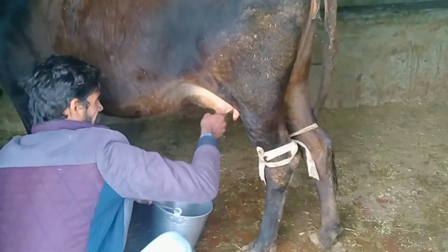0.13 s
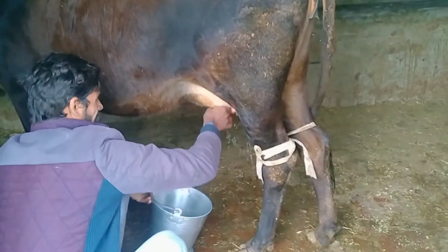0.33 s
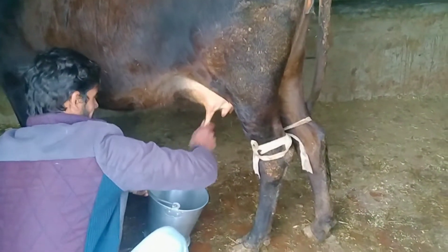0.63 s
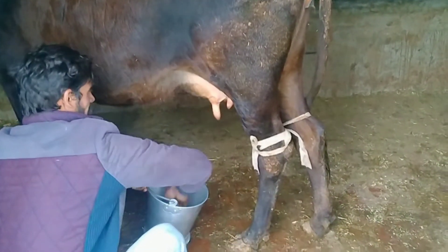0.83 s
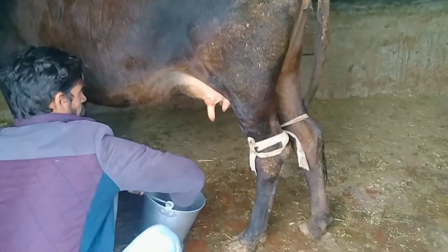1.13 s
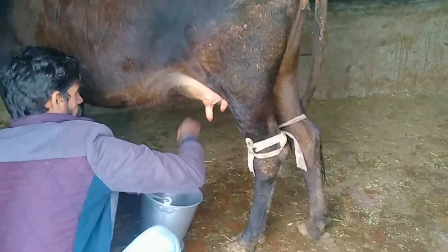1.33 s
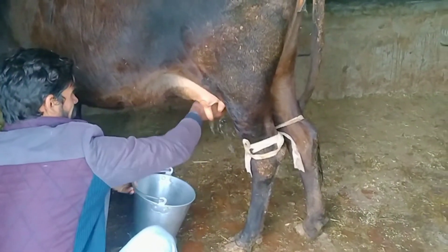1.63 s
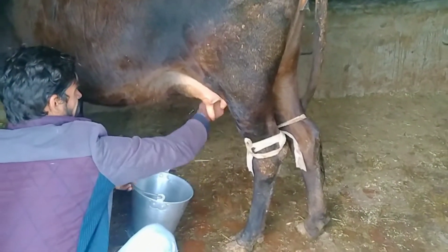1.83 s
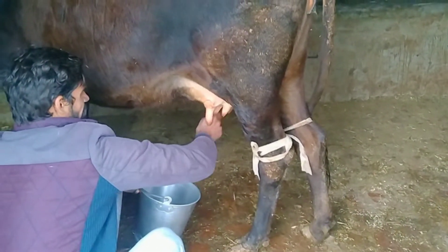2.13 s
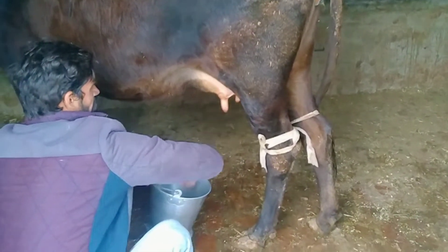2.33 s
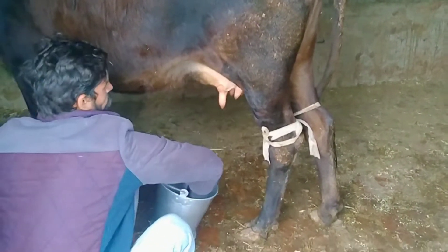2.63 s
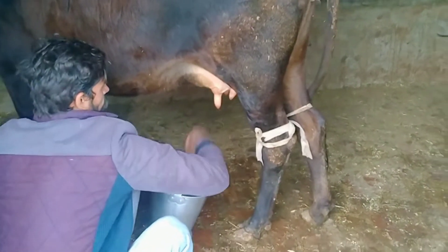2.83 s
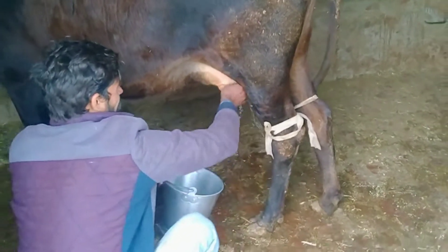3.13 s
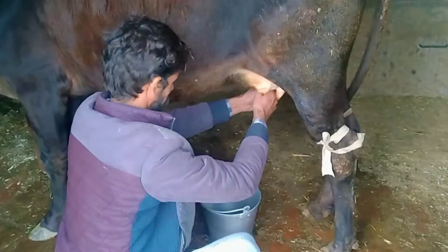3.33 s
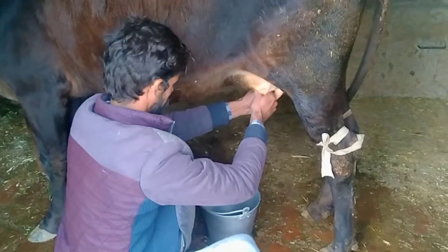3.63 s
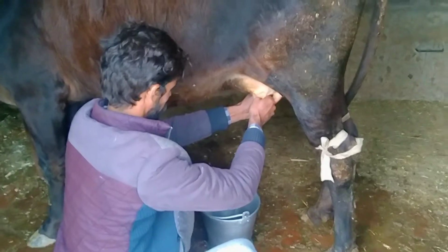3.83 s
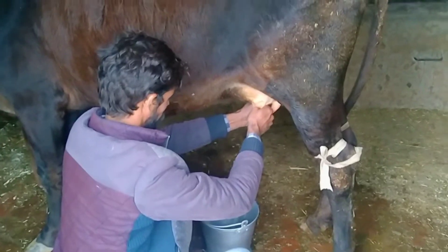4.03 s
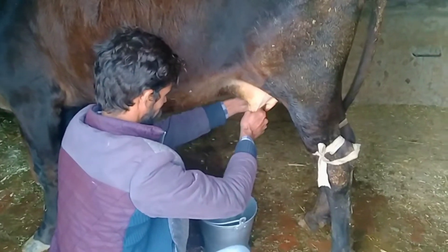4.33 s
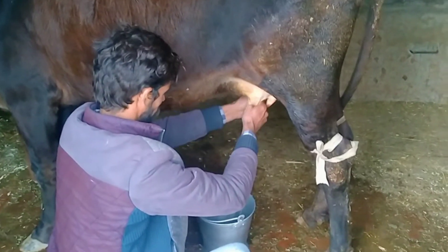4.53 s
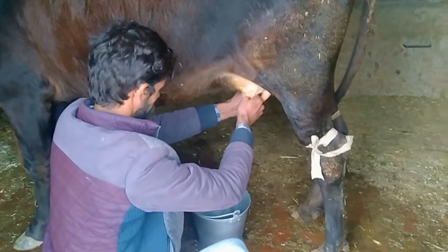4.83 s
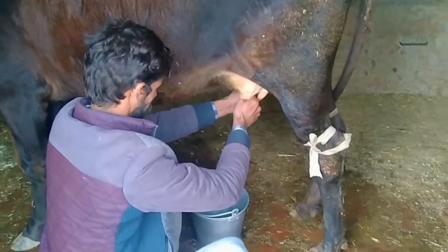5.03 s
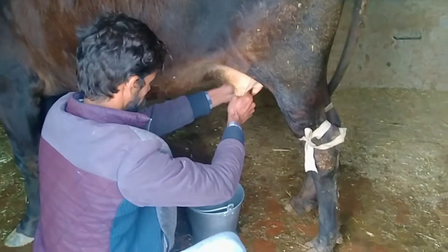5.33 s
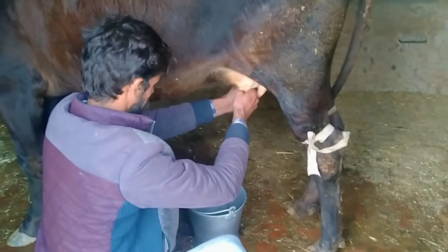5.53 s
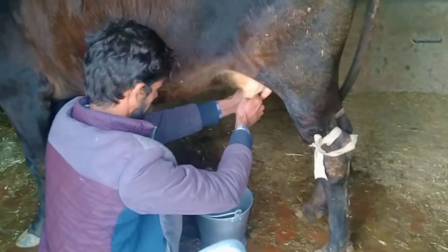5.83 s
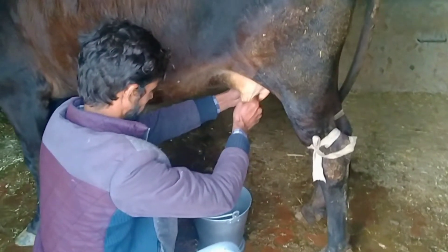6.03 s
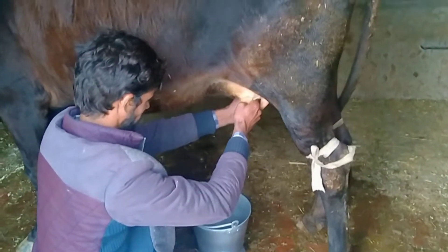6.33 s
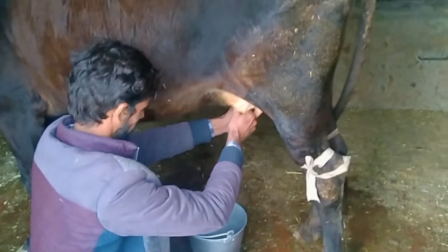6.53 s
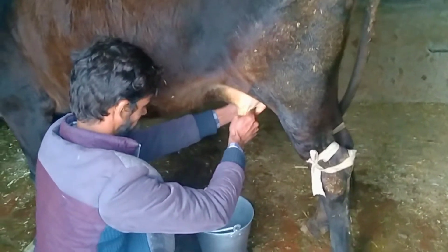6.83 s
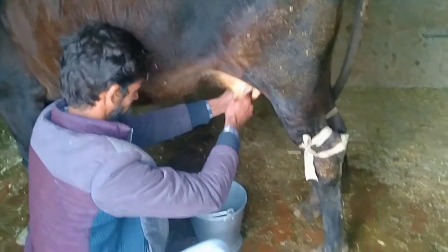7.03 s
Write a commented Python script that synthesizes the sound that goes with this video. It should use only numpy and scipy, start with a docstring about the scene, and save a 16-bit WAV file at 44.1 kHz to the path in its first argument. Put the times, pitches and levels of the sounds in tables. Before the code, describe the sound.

Wet plops, drips and slippery finger snaps over a bucket in a shed, then rhythmic jets of milk ring and hiss against bare steel.

```python
"""Plops, drips and wet snaps come first: a hand wets the teats with water from a steel bucket, a far machine
whining. Then jets of milk hit the bare steel, which sings and hisses, with one deep thump; faint rumble and hush.
Droplet impulses drive the steel's resonances, the spatter and the mist; drips and plops are climbing sines;
snaps are short clicks with a hissing tail; skin and slosh are coloured grains, the machine narrow filtered noise."""
import sys
import numpy as np
from scipy import signal
from scipy.fft import rfft, irfft, next_fast_len
from scipy.io import wavfile
from scipy.ndimage import uniform_filter1d

SR = 44100
rng = np.random.default_rng(int(sys.argv[2]) if len(sys.argv) > 2 else 0)


def output_pcm(signal):
    """Save a mono or channel-first signal as 16-bit PCM at the path in sys.argv[1].

    Samples are clipped to [-1, 1] before scaling.
    """
    pcm = np.clip(np.atleast_2d(signal).T, -1, 1) * 32767
    wavfile.write(sys.argv[1], SR, np.round(pcm).astype(np.int16))


N = 316197   # length in samples

# Spectra give relative colour only; each coloured layer is brought to rms 1 before its level.
# low rumble of the shed air: pitch_hz, density_db (per Hz)
RUMBLE_SPECTRUM = [(8.8, -14), (15, 8), (32, -4), (65, 1), (90, -9), (130, -9.5), (210, -17), (329, -16),
                   (380, -12.5), (418, -14.5), (499, -20), (656, -21), (700, -19.5), (910, -66),
                   (1540, -120)]
# rumble level through time, before a 1 dB lift: time_s, level_db
RUMBLE_LEVEL = [(0, -63), (1.0, -59.5), (1.4, -62), (2.9, -63.5), (3.45, -64), (3.73, -70.5), (3.93, -65.5),
                (4.7, -62), (6.0, -59.5), (7.17, -60.5)]
# faint steady hush: pitch_hz, density_db (per Hz)
HUSH_SPECTRUM = [(240, -49), (400, -26.5), (942, -24.5), (1320, -25), (1540, -22), (1740, -16), (2090, -27),
                 (10100, -37.5), (13100, -35.5), (15500, -32)]
# tones of the far machine: pitch_hz, width_hz, level_db (relative)
WHINE_TONES = [(1159, 19, -13), (1336, 19, -16), (1913, 16, -7.5), (2764, 5.2, -4.5), (2790, 7.5, -14),
               (3910, 13, -17.5)]
# gain of the whole whine: time_s, gain_db
WHINE_GAIN = [(0, -61), (1.2, -60), (2.25, -63.5), (2.45, -74), (2.6, -100), (7.17, -100)]

# drips ringing on the water; the last is a low thud as the second squirt lands:
# start_s, level_db (before trim), pitch_hz (at the start)
DRIPS = [(.185, -63.5, 686), (.861, -46.5, 3440), (.883, -47, 2390), (0.906, -50, 4800), (0.907, -46, 7200),
         (.95, -46, 7160), (1.012, -52, 1600), (1.031, -48, 1373), (1.058, -49.5, 3850), (1.084, -43, 5300),
         (1.143, -47.5, 4770), (1.151, -46.5, 2070), (1.187, -44, 7880), (1.2, -47, 1100),
         (1.228, -45, 2680), (1.245, -50, 5300), (1.297, -45.5, 3600), (1.313, -40.5, 2360),
         (1.313, -45.5, 1282), (1.322, -44, 3340), (1.342, -40.5, 2090), (1.436, -44, 2150),
         (2.454, -51.5, 1234), (2.588, -46, 2380), (2.625, -55, 3200), (2.82, -58, 2720),
         (2.847, -52, 4670), (2.911, -54, 1630), (2.926, -52, 6100), (3.047, -49.5, 1324),
         (3.215, -61.5, 1055), (4.19, -55, 777)]
# low plops, four while the hand is wetting and a deep thump during the jets:
# start_s, level_db (before trim), pitch_hz (at the start), t60_s (before the note is closed off), rise_s
PLOPS = [(0.176, -45, 320, 0.051, .01), (.884, -37, 379.3, 0.52, 0.023), (1.881, -52, 380, 0.051, .008),
         (2.453, -38.5, 373.3, 0.38, 0.004), (5.77, -46.5, 129, 0.17, 0.011)]
# thin squeaks of wet fingers sliding: start_s, end_s, from_hz, to_hz, level_db (before the uneven slip)
SQUEAKS = [(2.58, 2.648, 4280, 4600, -65), (3.27, 3.378, 3110, 3290, -65), (3.324, 3.426, 2100, 1950, -69),
           (3.734, 3.79, 3650, 5130, -74)]
# loud wet snaps of skin and water film: start_s, level_db, pitch_hz, air_db (relative, before trim)
LOUD_SNAPS = [(0.0315, -42, 7500, -23), (0.0988, -38, 5600, -18), (0.2737, -27, 5230, -47),
              (0.4284, -43.5, 4770, -28), (0.5786, -53, 8360, -4), (0.7566, -54, 6700, -14),
              (0.8216, -41.5, 6300, -12), (0.84, -43, 6400, -20), (0.861, -40, 7260, -12),
              (0.8824, -42, 7210, -23), (0.9233, -47, 6470, -3), (1.1034, -50, 6720, -11),
              (1.2271, -44, 7330, -25), (1.3116, -42, 6800, -8), (1.5968, -51, 7360, -6),
              (1.7865, -38, 5400, -15), (1.803, -31.5, 6250, -25), (1.8437, -32.5, 6660, -12.5),
              (2.2447, -41, 6140, -12), (2.4204, -44, 4870, -23), (2.4337, -27, 6540, -29),
              (2.825, -57, 7080, -1), (3.096, -49, 5130, -13), (3.276, -51, 4550, 2),
              (3.4685, -35.5, 6200, -31), (3.5042, -33, 5580, -15), (3.8287, -45, 6820, 1)]
# water round the hand: time_s, gain_db, colour_hz
SLOSH_MOVES = [(0, -63, 2600), (.2, -60, 2460), (.27, -65, 2900), (.5, -63, 2550), (.7, -60.5, 2560),
               (.97, -59.5, 2750), (1.04, -50.5, 1680), (1.09, -57.5, 2500), (1.14, -52.5, 2200),
               (1.3, -57, 2570), (1.44, -60.5, 2260), (1.5, -64.5, 2650), (1.8, -61, 2650),
               (2.2, -64, 2340), (2.38, -65, 2650), (2.47, -63, 1500), (2.52, -63.5, 3060),
               (2.71, -59.5, 2200), (2.78, -64.5, 2200), (2.9, -56.5, 1740), (3.05, -64, 1560),
               (3.2, -71, 1860), (3.29, -63.5, 3070), (3.54, -61, 2700), (3.565, -73, 2700)]
# colour of the water grains: pitch_hz, density_db (per Hz)
SLOSH_SPECTRUM = [(290, -29), (500, -9.5), (841, 2), (1560, 0), (1680, 0), (2060, -0.5), (3270, 1),
                  (5000, -11), (6500, -25), (11000, -120)]
# rustling swells, mostly rubbing fingers; the one at 0.278 s is the tail of a loud snap:
# end_s, build_s, rustle_db, air_db (relative to the rustle)
RUSTLE_SWELLS = [(.03, 0.079, -66, -9), (.21, 0.85, -62, -5.5), (0.278, 0.013, -53.5, -34),
                 (.48, 0.089, -63.5, 4), (.75, 1, -68.5, -5), (.96, 0.4, -60.5, -5),
                 (1.06, 0.044, -65, -22), (1.14, 0.28, -56.5, -7), (1.35, 0.08, -47, -8.5),
                 (1.6, 0.042, -67, -5), (1.86, 0.44, -61, 2.5), (2.04, 0.19, -66, -9),
                 (2.25, 0.067, -64, -6), (2.432, 0.044, -51, -9), (2.71, 0.5, -63.5, -11),
                 (2.87, 0.097, -58, 1), (2.93, 0.11, -62.5, -4), (3.16, .3, -68, -3),
                 (3.28, 0.043, -66.5, 5.5), (3.51, 0.33, -61.5, -2)]
# body of the rustle: pitch_hz, density_db (per Hz)
RUSTLE_SPECTRUM = [(2060, -6), (3500, -5), (4280, -9.5), (5290, -8.5), (5830, -5), (7640, -3.5),
                   (9500, -34), (12400, -44), (20900, -120)]
# airy top of the rustle: pitch_hz, density_db (per Hz)
RUSTLE_AIR_SPECTRUM = [(5000, -37), (8500, -8.5), (9640, -5.5), (11100, -8), (14900, 4), (15500, 5)]

# jets of milk: start_s, swell_s, hold_s, bottom_db, wall_db, spray_db, aim (0 = on the wall, 1 = on the bottom),
# then favour_db for each of the four mode families, set by the spot that is hit
SQUIRTS = [(3.781, 0.099, 0.088, -49.5, -51, -52.5, 0.41, 1.5, -5.5, 4.5, -0.5),
           (4.187, 0.045, 0.11, -54.5, -49, -52.5, 0.34, 0, 0, 6, 0.5),
           (4.585, 0.057, 0.047, -47, -45.5, -50, 0.23, 2, 0.5, -4, -9),
           (4.748, 0.076, 0.11, -49.5, -47, -48, 0.052, -10, 1, 6, -8.5),
           (4.997, .1, .24, -39.5, -43.5, -45.5, 0.79, .1, -6, 4, -1.5),
           (5.465, 0.086, .18, -42.5, -41, -44, 0.091, -1, 4, -1, -3.5),
           (5.852, 0.19, 0.063, -37, -39, -40, 0.92, 4.5, 2.5, 5, 1),
           (6.302, 0.077, .19, -36, -40.5, -47, 0.17, 7.5, -4.5, -2.5, 4.5),
           (6.677, .14, .1, -38, -38.5, -40, 0.92, 3.5, 1, 2.1, 3),
           (7.073, 0.14, .1, -39.5, -39, -43, 0.89, -2, -5, 3, 4)]
# bucket modes: pitch_hz (before the pitch factor), width_hz, on_wall_db, on_bottom_db (relative)
BUCKET_MODES = [(729.4, 23, -5, -2), (735.9, 23, -8.5, 9), (820, 84, -28.5, -18.5), (1172, 31, -4, -3.5),
                (1247, 57, 6, -3), (1278, 52.6, 2.5, 1.5), (1373.4, 28.6, -2.5, -0.5), (1493, 26, -45, -3),
                (1958, 23, 6.5, -6), (2040, 92.4, 4.5, 5), (2056, 48, 0, 1.5), (2085, 18.3, 7, -8.5),
                (2150, 16, -32, -7), (2540, 32, -16, 1), (2807, 43, -8.5, -8.5), (2995, 49, -1.5, -12),
                (3516, 32, -21.5, -6), (4060, 36, -1.5, -11), (4200, 31, -23, -23), (4434, 56, -16.5, -3.5),
                (5060, 24, -18, -10), (5335, 48, -4.5, -0.5), (5774, 230, -13.5, -4.5), (6370, 73, -32, -5),
                (6705, 46, -4.5, -15.5), (6830, 29, -4, -0.5), (6900, 76, -14, -30), (7140, 54, -11, 0),
                (7280, 130, -3.5, -9.5), (8450, 200, -9.5, -53)]
# neighbouring modes favoured together: centre_hz, reach (in natural-log pitch)
MODE_FAMILIES = [(740, .05), (2050, .06), (4150, .06), (7280, .06)]
# wash of dense unresolved wall modes: pitch_hz, density_db (per Hz)
WALL_WASH_SPECTRUM = [(1350, -54), (2300, -18), (3010, -5.5), (3780, 1.5), (4070, 0), (4720, -4), (7350, 0),
                      (10000, -14), (13000, -49), (22000, -120)]
# milk film spattering on the bottom: pitch_hz, density_db (per Hz)
FILM_SPECTRUM = [(300, -25), (500, -5.5), (900, 5), (1600, 1.5), (2300, -11), (3200, -3)]
# hissing mist: pitch_hz, density_db (per Hz)
SPRAY_SPECTRUM = [(4710, -40), (8000, -9), (9340, -8.5), (10600, -2), (11300, -1.5), (12600, 2),
                  (14900, 2.5), (15500, 1)]
# last drops of a squirt pattering on the milk film: time_s, level_db
DRIBBLE_LEVEL = [(4.4, -89), (4.45, -84), (4.58, -64.5), (4.62, -78)]

HUSH_DB = -73.5
SHED_T60_S, SHED_DB = 0.14, -15
CUTOFF_HZ = 15550
DRIP_T60_S, DRIP_SHORTENS = 0.1, 0.91   # ring time at 1 kHz; power of pitch by which it shrinks
SMALL_SNAPS, WET_UNTIL_S = 26, 3.5   # how many small snaps, and the latest they can start
SMALL_SNAP_DB, SMALL_SNAP_HZ, SMALL_AIR_DB = (-60, -54), (4570, 7600), (-20, -11)   # ranges of chance
RUSTLE_BUILD_DB, RUSTLE_FADE_DB_PER_S = 18.5, 265
AIR_SHARE = 1.77   # the air swings wider than the rustle
# pressure of a squirt: lands, swells, holds, dies
ATTACK_S, FIRST_TOUCH_DB, RELEASE_DB_PER_S = 0.019, -6.5, 129.5
# how far bottom, wall and spray follow the pressure
SWELL_SHARES, RELEASE_SHARES = (0.7, 1.23, 1.07), (0.56, 0.85, 1.01)
# spatter and wash against the ringing: on the wall, then the gain as the aim moves to the bottom
FILM_DB, FILM_AIM_DB, WASH_DB, WASH_AIM_DB = -19, 8.5, -4.5, 4.5
BOTTOM_TOP_HZ = 2300   # modes below feed the bottom ring, the others the wall ring
# milk loads the modes below the top as it collects: pitch factor at the first squirt and its fall
EMPTY_PITCH, PITCH_SAG_PER_S, LOADED_TOP_HZ = 1.021, 0.011, 4350
# the jet shifts, so each mode above the steady ones swells and sinks on its own
MODE_WANDER_DB, STEADY_TOP_HZ = 2, 800
# the broad hollow mode in this range is loud in the empty bucket and drowns in milk
BODY_HZ, BODY_EMPTY_DB, BODY_DAMP_DB_PER_S = (800, 900), 10.5, 4.0


def from_db(db):
    """Decibels to amplitude."""
    return 10 ** (np.asarray(db) / 20)


def rms_one(x):
    """Bring a sound to rms 1."""
    return x / np.sqrt(np.mean(x ** 2) + 1e-20)


def in_time(rows):
    """Columns of a table joined by straight lines; -120 outside its span."""
    s, *columns = np.transpose(rows)
    return [np.interp(np.arange(N) / SR, s, c, left=-120, right=-120) for c in columns]


def drift(rate_hz):
    """Slow chance of rms 1: low-passed noise, made at every 40th sample and joined by lines."""
    r = np.exp(-80 * np.pi * rate_hz / SR)
    noise = rng.standard_normal(N // 40 + 2002)
    slow = signal.lfilter([1], [1, -2 * r, r * r], noise)[2000:]   # drop the filter's start-up
    return np.interp(np.arange(N) / 40, np.arange(len(slow)), rms_one(slow))


def coloured(x, spectrum):
    """Give a signal a spectrum in dB per Hz, drawn over log pitch; rms 1."""
    size = next_fast_len(N)
    hz = np.maximum(np.fft.rfftfreq(size, 1 / SR), 1)
    points = np.array(spectrum)
    gain_db = np.interp(np.log(hz), np.log(points[:, 0]), points[:, 1], left=-90, right=-90)
    return rms_one(irfft(rfft(x, size) * from_db(gain_db), size)[:N])


def resonance(x, hz, width_hz):
    """Two-pole resonance with gain close to 1 on top."""
    r = np.exp(-np.pi * width_hz / SR)
    feed = np.array([1, 0, -1]) * (1 - r * r) / 2
    return signal.lfilter(feed, [1, -2 * r * np.cos(2 * np.pi * hz / SR), r * r], x)


def droplets(per_s, spread_db):
    """Random impacts of uneven size and either sign; rms 1."""
    sizes = from_db(spread_db * np.minimum(rng.exponential(1, N), 5)) * rng.choice([-1, 1], N)
    return rms_one(sizes * (rng.random(N) < per_s / SR))


def add(out, s, sound):
    """Mix a short sound in at time s."""
    at = round(s * SR)
    out[at:at + len(sound)] += sound[:N - at]


def even(x):
    """Take out slow level changes."""
    return x / np.sqrt(uniform_filter1d(x ** 2, size=13000) + 1e-9)


def blend(ring, noise, noise_db):
    """Ringing and noise in a set ratio, at the power of one."""
    return (ring + from_db(noise_db) * noise) / np.sqrt(1 + from_db(noise_db) ** 2)


def rumble():
    """Low shed air: coloured noise whose level moves slowly."""
    level_db = in_time(RUMBLE_LEVEL)[0] + 1.0
    return from_db(level_db) * coloured(rng.standard_normal(N), RUMBLE_SPECTRUM)


def hush():
    """A faint steady bed of coloured noise."""
    return from_db(HUSH_DB) * coloured(rng.standard_normal(N), HUSH_SPECTRUM)


def whine():
    """Narrow unsteady tones from a far motor that stops: noise through tight resonances."""
    noise = rng.standard_normal(N)
    tones = sum(from_db(db) * rms_one(resonance(noise, hz, width_hz)) for hz, width_hz, db in WHINE_TONES)
    return from_db(in_time(WHINE_GAIN)[0]) * tones


def shed(x):
    """A short diffuse tail from the wall and the cow's flank: decaying noise convolved with the sound."""
    t = np.arange(round(SHED_T60_S * SR)) / SR
    tail = rng.standard_normal(len(t)) * from_db(-60 * t / SHED_T60_S) * (t > 0.003)
    tail /= np.sqrt(np.sum(tail ** 2))
    return x + from_db(SHED_DB) * signal.fftconvolve(x, tail)[:N]


def climbing_note(hz, t60, rise_s, climb):
    """A dying sine whose pitch climbs, as of trapped air nearing the surface."""
    t = np.arange(round(t60 * SR)) / SR
    tone = np.sin(2 * np.pi * hz * (t + climb * t * t / t60))
    return tone * from_db(-60 * t / t60) * (1 - np.exp(-t / rise_s))


def drips():
    """Drips, and one low thud among the jets: a climbing note under a splashy edge of filtered noise."""
    out, t = np.zeros(N), np.arange(2000) / SR
    for s, level_db, hz in DRIPS:
        t60 = DRIP_T60_S * (hz / 1000) ** -DRIP_SHORTENS
        ring = climbing_note(hz, t60, rise_s=0.00053, climb=0.071)
        splash = rng.standard_normal(len(t)) * np.exp(-t / 0.011)
        add(out, s, from_db(level_db + 3.0) * ring)
        add(out, s, from_db(level_db + 10) * resonance(splash, hz, 460))
    return out


def plops():
    """Plops of the wetting and a deep thump among the jets: a low note over a dull thud of resonant noise."""
    out, t = np.zeros(N), np.arange(6000) / SR
    closing = np.exp(-(t / 0.052) ** 4) + from_db(-13.0)   # the note closes off, leaving a faint ring
    for s, level_db, hz, t60, rise_s in PLOPS:
        note = climbing_note(hz, t60, rise_s, climb=0.012)[:len(t)]
        add(out, s, from_db(level_db - 0.5) * note * closing[:len(note)])
        push = rng.standard_normal(len(t))
        thud = rms_one(resonance(push, 0.77 * hz, 135)) + 0.13 * rms_one(resonance(push, 1.62 * hz, 130))
        add(out, s, from_db(level_db - 9.5) * thud * np.exp(-t / 0.02))
    return out


def squeaks():
    """Wet fingers slide: faint gliding tones, blurred by the uneven slip."""
    out = np.zeros(N)
    for start, end, from_hz, to_hz, level_db in SQUEAKS:
        size = round((end - start) * SR)
        glide = np.sin(2 * np.pi * np.cumsum(np.linspace(from_hz, to_hz, size)) / SR)
        add(out, start, from_db(level_db) * np.hanning(size) ** 0.17 * glide)
    return out * (0.54 + 1.2 * drift(180))


def snaps():
    """A film bursts: a fast-dying click, a brighter tick on top and a short hissing tail."""
    out, t = np.zeros(N), np.arange(1500) / SR
    low, top = np.transpose([(0, WET_UNTIL_S), SMALL_SNAP_DB, SMALL_SNAP_HZ, SMALL_AIR_DB])
    small = low + (top - low) * rng.random((SMALL_SNAPS, len(low)))   # small ones come at random
    high = signal.butter(4, 9500, "high", fs=SR, output="sos")
    tail = from_db(-17.5) * np.exp(-t / 0.0057)
    for s, level_db, hz, air_db in np.r_[LOUD_SNAPS, small]:
        low_hiss, air_hiss = rng.standard_normal((2, len(t)))
        click = np.sin(2 * np.pi * hz * t) * np.exp(-t / 0.00068)
        click += tail * rms_one(resonance(low_hiss, hz, 1200))
        tick = signal.sosfilt(high, air_hiss * (from_db(0.5) * np.exp(-t / 0.00019) + tail))
        add(out, s, from_db(level_db) * (click + from_db(air_db + 10.5) * tick))
    return out


def rustle_levels():
    """Gains of rustle and air: each swell builds up and stops short."""
    t = np.arange(N // 40 + 1) * 40 / SR   # every 40th sample is enough
    power = np.zeros((2, len(t)))
    for end, build, level_db, air_db in RUSTLE_SWELLS:
        lost_db = np.maximum(RUSTLE_BUILD_DB * (end - t) / build, RUSTLE_FADE_DB_PER_S * (t - end))
        power += from_db([level_db - lost_db, level_db + air_db - AIR_SHARE * lost_db]) ** 2
    return [np.interp(np.arange(N) / SR, t, gain) for gain in np.sqrt(power)]


def wetting():
    """Water sloshes round the hand with a shifting colour; a rustle, mostly of wet skin, crackles finely."""
    slosh_db, colour_hz = in_time(SLOSH_MOVES)
    grains = coloured(droplets(6000, spread_db=2.5), SLOSH_SPECTRUM)
    slosh = from_db(-6.0) * grains
    for hz in np.geomspace(1000, 4400, num=16):   # the bubbles nearest the present colour ring out
        near = np.exp(-(np.log(np.maximum(colour_hz, 1) / hz) / 0.37) ** 2)
        flutter = from_db(-2.5 + 6.2 * drift(25))
        slosh = slosh + flutter * near * resonance(grains, hz, 0.03 * hz)
    rustle_gain, air_gain = rustle_levels()
    crackle = droplets(5000, spread_db=1.0) * from_db(4.55 * drift(25))
    rustle = rustle_gain * coloured(crackle, RUSTLE_SPECTRUM)
    air_gain = air_gain + from_db(slosh_db - 21.5)   # the slosh brings some air too
    return slosh * from_db(slosh_db) + rustle + air_gain * coloured(crackle, RUSTLE_AIR_SPECTRUM)


def per_squirt(values):
    """One value for each squirt, gliding to the next as that begins."""
    starts = [row[0] for row in SQUIRTS]
    now = np.maximum(np.searchsorted(starts, np.arange(N) / SR) - 1, 0)
    return uniform_filter1d(np.asarray(values, float)[now], size=1300)


def jet_levels():
    """Gains of bottom ring, wall ring and spray: every squirt lands, swells, holds and dies away."""
    power, t = np.zeros((3, N)), np.arange(N) / SR
    for start, swell, hold, *level_db in np.array(SQUIRTS)[:, :6]:
        full = start + ATTACK_S + swell
        landed = np.clip((t - start) / ATTACK_S, 0, 1)
        short_db = FIRST_TOUCH_DB * np.clip((full - t) / swell, 0, 1)
        lost_db = RELEASE_DB_PER_S * np.maximum(t - full - hold, 0)
        pressure_db = np.outer(SWELL_SHARES, short_db) - np.outer(RELEASE_SHARES, lost_db)
        power += (landed * from_db(np.c_[level_db] + pressure_db)) ** 2
    return np.sqrt(power)


def steel(hits):
    """Each squirt drums the same modes from its own spot; they ring on a little after it ends."""
    bottom, wall = np.zeros((2, N))
    centre_hz, reach = np.transpose(MODE_FAMILIES)
    wander = [from_db(MODE_WANDER_DB * drift(7.2) * (mode[0] > STEADY_TOP_HZ)) for mode in BUCKET_MODES]
    ends = [row[0] for row in SQUIRTS[1:]] + [N / SR]
    for (start, _, _, _, _, _, aim, *favour_db), end in zip(SQUIRTS, ends):
        milking_s = start - SQUIRTS[0][0]
        pitch = EMPTY_PITCH - PITCH_SAG_PER_S * milking_s
        span = slice(round(start * SR), round(end * SR))
        for k, (hz, width_hz, on_wall_db, on_bottom_db) in enumerate(BUCKET_MODES):
            level_db = on_wall_db + np.clip(aim, 0, 1) * (on_bottom_db - on_wall_db)
            level_db += np.dot(favour_db, np.exp(-(np.log(hz / centre_hz) / reach) ** 2))
            if BODY_HZ[0] < hz < BODY_HZ[1]:
                level_db += BODY_EMPTY_DB - BODY_DAMP_DB_PER_S * milking_s
            level_db += rng.normal(0, 1.0)
            hz = hz * (pitch if hz < LOADED_TOP_HZ else 1)
            drive = np.r_[hits[span] * wander[k][span], np.full(4000, 1e-18)]   # room to ring on
            near = resonance(drive, hz, 4.95 * width_hz)   # a mode answers little far from its pitch
            ring = (-1) ** k * from_db(level_db) * resonance(near, hz, width_hz)
            add(bottom if hz < BOTTOM_TOP_HZ else wall, start, ring)
    return even(bottom), even(wall)


def crowd(hits, low_hz, high_hz, count, width_hz, mix_db):
    """Crowded unresolved modes: a new mix at each squirt that wanders with the jet."""
    out, step_hz = np.zeros(N), (high_hz - low_hz) / count
    for k in range(count):
        level_db = per_squirt(rng.normal(0, mix_db, len(SQUIRTS))) + 3.0 * drift(6.7)
        hz = low_hz + step_hz * (k + rng.random())
        out += (-1) ** k * resonance(hits * from_db(level_db), hz, width_hz)
    return even(out)


def jets():
    """The stream breaks into droplets that drum the steel, spatter on the milk film and throw up a hissing mist."""
    bottom_gain, wall_gain, spray_gain = jet_levels()
    aim = per_squirt(np.array(SQUIRTS)[:, 6])
    hits, mist = droplets(7000, spread_db=2.5), droplets(9000, spread_db=3.0)
    bottom, wall = steel(hits)
    film = coloured(droplets(7000, spread_db=-2.0), FILM_SPECTRUM)
    dense = crowd(mist, 4593, 9810, count=30, width_hz=92, mix_db=5.0)
    wash = coloured(dense + hits[::-1], WALL_WASH_SPECTRUM)   # reversed hits serve as fresh droplets
    fizz = crowd(hits, 8200, 15580, count=32, width_hz=150, mix_db=2.5)
    spray = coloured(fizz + from_db(-2.5 + 2.6 * drift(26)) * mist, SPRAY_SPECTRUM)
    sound = bottom_gain * blend(bottom, film, FILM_DB + FILM_AIM_DB * aim)
    sound += wall_gain * blend(wall, wash, WASH_DB + WASH_AIM_DB * aim)
    sound += from_db(in_time(DRIBBLE_LEVEL)[0]) * film
    sound += spray_gain * spray
    return sound * from_db(0.46 * drift(20))   # the stream sputters


def scene():
    """Background, wetting and jets in one mono mix, sent to both channels."""
    background = rumble() + hush() + whine()
    echoing = shed(drips() + plops() + squeaks() + snaps())
    mono = background + echoing + wetting() + jets()
    return np.stack([mono, mono])


def record(dry):
    """The top is cut steeply by an elliptic low-pass."""
    return signal.sosfilt(signal.ellip(12, 0.5, 70, CUTOFF_HZ, fs=SR, output="sos"), dry)


dry = scene()
out = record(dry)
output_pcm(out)
```